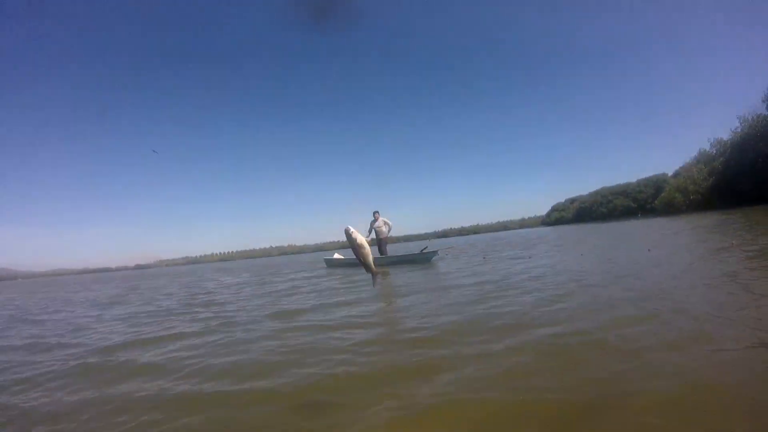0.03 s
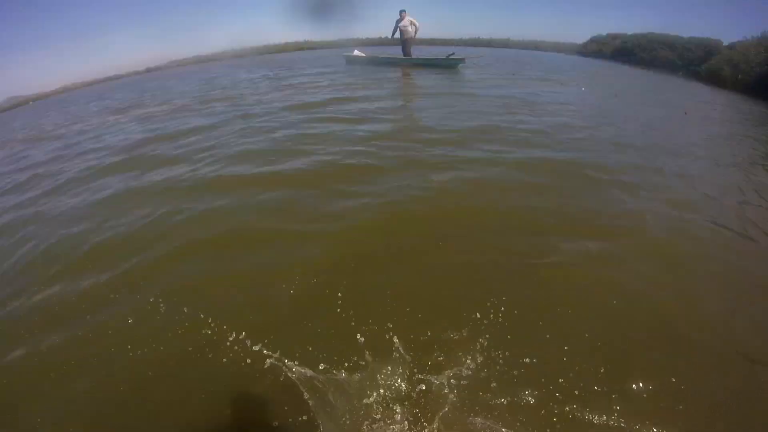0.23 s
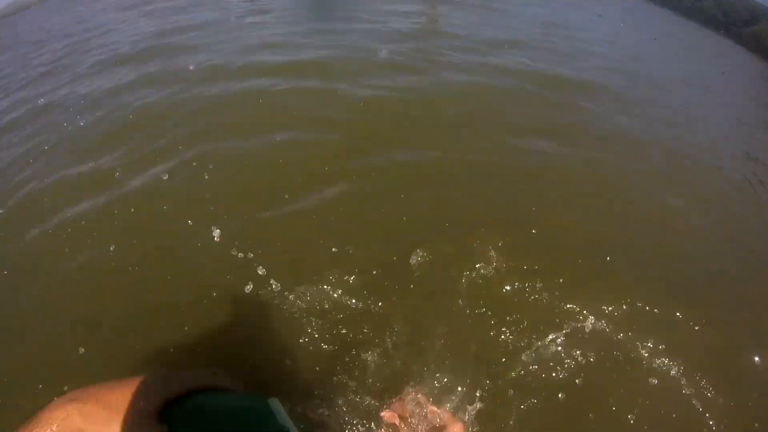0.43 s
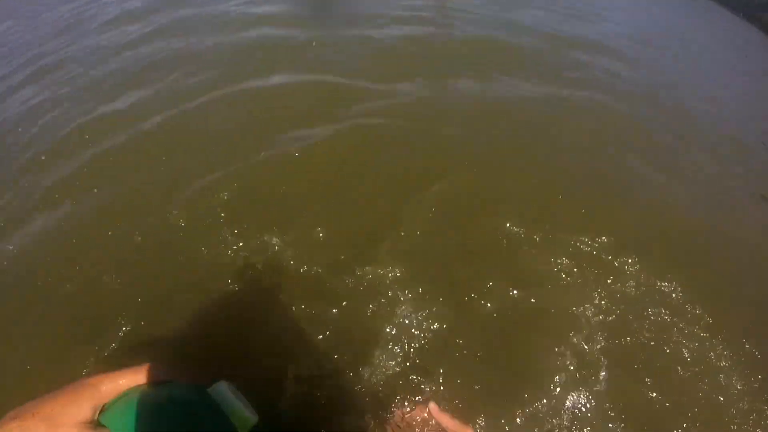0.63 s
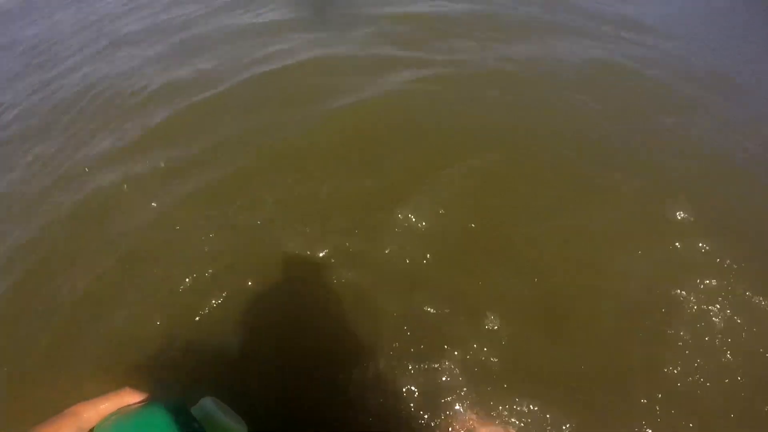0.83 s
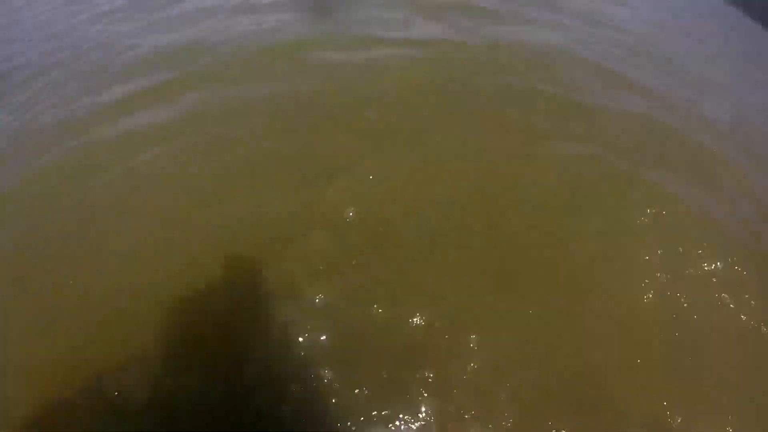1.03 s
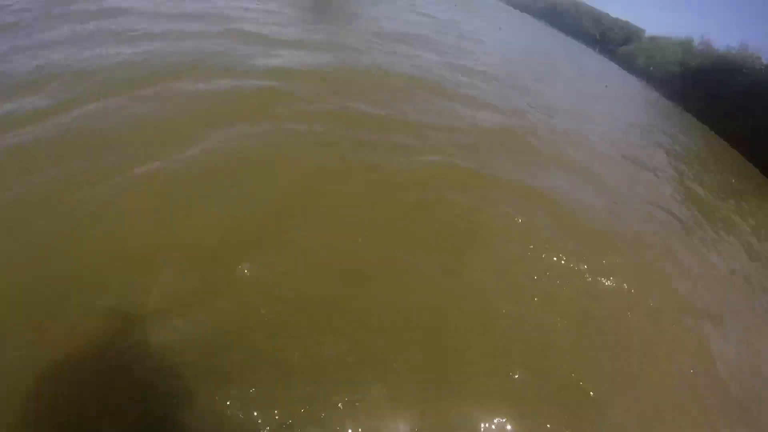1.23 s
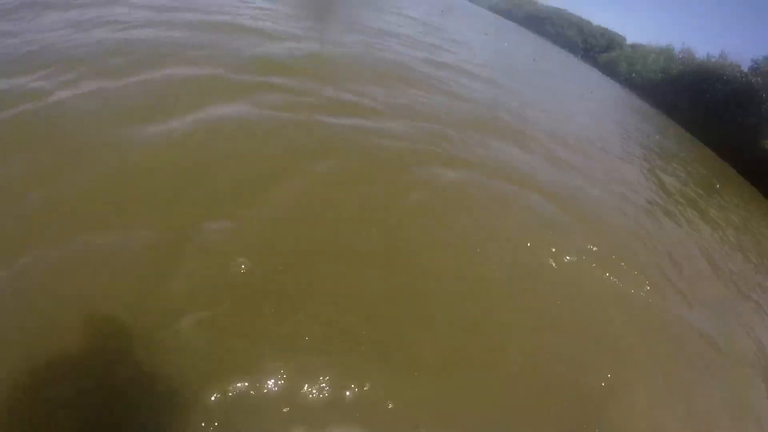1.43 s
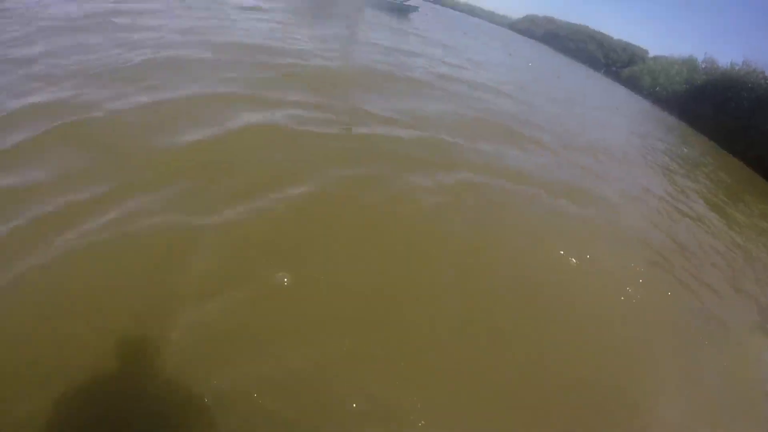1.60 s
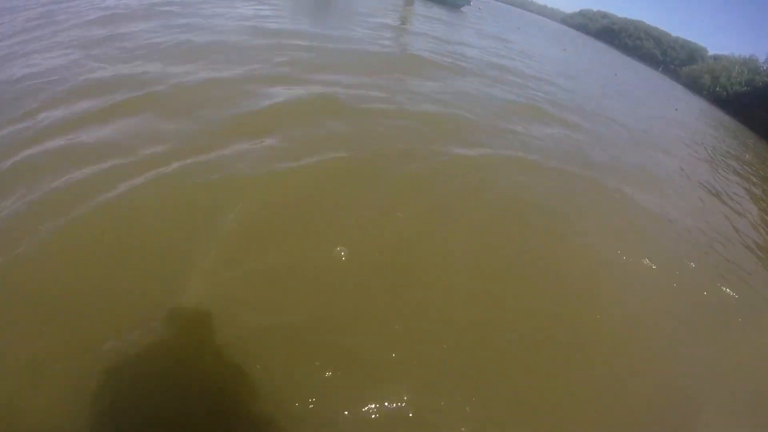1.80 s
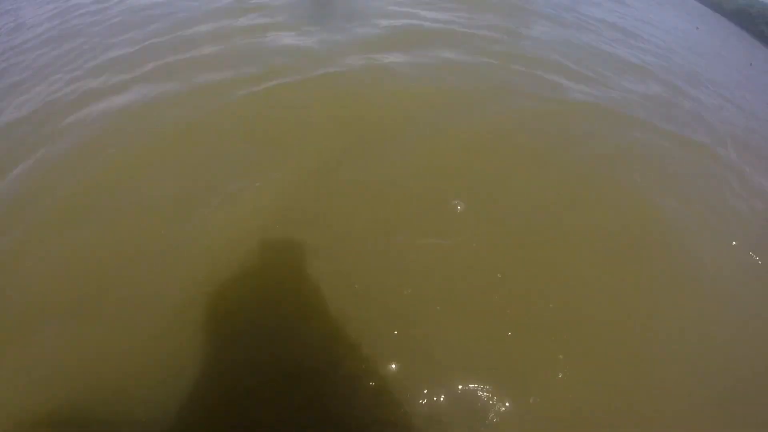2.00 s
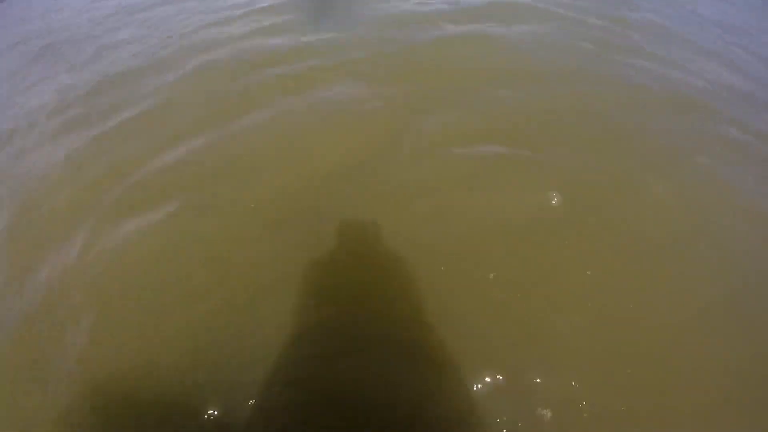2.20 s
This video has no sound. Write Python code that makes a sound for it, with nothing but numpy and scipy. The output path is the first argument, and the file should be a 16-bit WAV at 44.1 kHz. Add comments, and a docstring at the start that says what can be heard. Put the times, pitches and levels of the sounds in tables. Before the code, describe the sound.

A fish drops into open water beside a small boat with a sharp splash and low gulp. Spray and a few drips follow over low wind and steady water hiss, heard close through a closed waterproof camera case.

```python
"""A fish drops into the water beside a small boat, heard through a closed waterproof camera case.
A sharp slap is followed by a low surge, the gulp of the closing hole, falling spray and a few drips.
The splash and spray are crowds of tiny clicks that make the case ring; drips are short, rising tones.
A few drops tap the case, and low wind buffets it over a steady wash of open water."""
import sys
import numpy as np
from scipy import signal
from scipy.fft import rfft, irfft
from scipy.io import wavfile
from scipy.ndimage import uniform_filter1d

SR = 44100
rng = np.random.default_rng(int(sys.argv[2]) if len(sys.argv) > 2 else 0)


def int16_out(signal):
    """Quantize to a 16-bit WAV file."""
    q = np.round(np.clip(np.atleast_2d(signal).T, -1, 1) * 32767)
    wavfile.write(sys.argv[1], SR, q.astype(np.int16))


N = 103635


def amp(db):
    """Turns decibels into a number to multiply a sound by."""
    return 10 ** (np.asarray(db) / 20)


def unit(x):
    """Scales a sound so that its average (rms) level is 1."""
    return x / np.sqrt(np.mean(x ** 2) + 1e-20)


def level_at(points, hz):
    """Joins (frequency [Hz], level [dB]) points with straight lines on an octave scale."""
    point_hz, db = np.transpose(points)
    return np.interp(np.log(hz + 1), np.log(point_hz + 1), db)


def add(mix, start, sound):
    """Mixes a sound in at a start time in seconds."""
    part = mix[max(round(start * SR), 0):][:len(sound)]
    part += sound[:len(part)]


def ring(db):
    """The short ring, with energy 1, that one click leaves in a filter with this spectrum."""
    log_gain = np.log(amp(np.r_[db, db[-2:0:-1]]))
    spectrum = np.exp(np.conj(signal.hilbert(log_gain)))  # no ringing before the click
    response = irfft(spectrum[:len(db)])
    return response / np.linalg.norm(response)


def case_boost(hz):
    """The closed case rings at some frequencies and swallows one band; gives the boost in dB."""
    # peaks and one dip of the case (frequency [Hz], width [Hz], boost [dB])
    resonances = [(1480, 200, 3.5), (2120, 220, 6), (2485, 130, 13), (3216, 280, 8), (4025, 280, 8),
                  (5070, 590, -13), (6060, 1500, 7.5), (7140, 200, 3), (8400, 270, 8.5), (9700, 510, 10)]
    return sum(db / (1 + (2 * (hz - centre) / width) ** 2) for centre, width, db in resonances)


def wash(level_db=-51, patch_db=0.72, low_cut_hz=80, size=512):
    """Distant ripples and breeze blend into an even hiss with faint drifting patches."""
    # tone of open water (frequency [Hz], relative level [dB])
    colour = [(53, -14.5), (90, 2), (124, -3.5), (236, -3), (318, -5.5), (354, -8.5), (429, -8.5),
              (531, -8.5), (566, -10.5), (926, -12.5), (1120, -14), (1550, -15.5), (4050, -23), (6480, -28),
              (14900, -41.5)]
    hz, hop = np.fft.rfftfreq(size, 1 / SR), size // 4
    real, imaginary, patches = rng.standard_normal((3, N // hop + 5, len(hz)))
    patches = uniform_filter1d(patches, size=16, axis=0)  # smooth over time
    patches = unit(uniform_filter1d(patches, size=7, axis=1))  # and over frequency
    spectra = (real + 1j * imaginary) * amp(level_at(colour, hz) + patch_db * patches)
    hiss = signal.istft(spectra.T, nperseg=size, noverlap=size - hop)[1][:N]
    low_cut = signal.butter(2, low_cut_hz, "high", fs=SR, output="sos")
    return amp(level_db) * unit(signal.sosfilt(low_cut, hiss))


def wind():
    """Wind presses on the case and makes a lumpy rumble."""
    # tone of the rumble (frequency [Hz], relative level [dB])
    colour = [(4, -54), (12, 5.5), (20, 4.5), (30, -13.5), (42, -11.5), (60, -16), (90, -23.5),
              (150, -32.5), (400, -76)]
    # strength of the rumble (time [s], level [dB])
    levels = [(0, -38), (.1, -44), (.17, -27.5), (.3, -33.5), (.45, -31.5), (.62, -38), (.71, -42.5),
              (.78, -39), (1.02, -38.5), (1.3, -40.5), (1.44, -39), (1.65, -42), (1.87, -38), (2.0, -44.5),
              (2.35, -42)]
    t, hz = np.arange(N) / SR, np.fft.rfftfreq(N, 1 / SR)
    spectrum = rfft(rng.standard_normal(N)) * amp(level_at(colour, hz))
    return unit(irfft(spectrum, N)) * amp(np.interp(t, *np.transpose(levels)))


def thumps():
    """Slow, low thumps on the case: the surge of the splash, then a few later buffets."""
    # low thumps (time [s], width [s], peak level [dB])
    pulses = [(0.14, 0.0079, -27.5), (0.28, 0.014, -15), (0.373, 0.017, -22.5), (1.531, 0.01, -31),
              (1.738, 0.0084, -31.5), (1.857, 0.017, -25.5), (1.939, 0.013, -29), (2.05, 0.0065, -33.5),
              (2.18, 0.0061, -40), (2.295, 0.012, -32.5)]
    t, out = np.arange(N) / SR, np.zeros(N)
    for centre, width, db in pulses:
        offset = (t - centre) / width
        out += amp(db) * (1 - offset ** 2) * np.exp(-offset ** 2 / 2)
    return out


def taps():
    """Drops strike the plastic case, which rings very briefly."""
    # drops hitting the case (time [s], peak level [dB])
    hits = [(1.6892, -36.5), (1.6913, -38), (2.18, -40)]
    # tones of the struck plastic (pitch [Hz], relative level [dB], time to fade by 60 dB [s])
    tones = [(840, -12, 0.0056), (1390, -2, .007), (2020, 1, .009), (2800, 0, .006), (3970, -7, 0.011)]
    t, out = np.arange(SR // 20) / SR, np.zeros(N)
    tap = sum(amp(db - 60 * t / fade) * np.sin(2 * np.pi * hz * t) for hz, db, fade in tones)
    for start, db in hits:
        add(out, start, amp(db) * tap / abs(tap).max())
    return out


def drips(rise_s=0.00044, glide=0.0019):
    """Small bubbles ring for a few milliseconds, rising slightly in pitch."""
    # single drips and bubbles (time [s], pitch [Hz], level [dB], fade time [s])
    bubbles = [(0.176, 6600, -31.5, 0.0012), (.1782, 4300, -41, .0024), (.187, 2300, -44, 0.0035),
               (.248, 1590, -44, .007), (.261, 1550, -43, 0.0024), (.264, 2360, -44, 0.0047),
               (.281, 2170, -50, 0.0047), (0.301, 209, -40.5, 0.012), (.303, 920, -47, 0.0062),
               (.302, 4070, -43, 0.0017), (.3205, 2430, -38.5, 0.0028), (.323, 1110, -44, 0.0029),
               (0.326, 1480, -36.5, 0.0028), (.332, 2510, -46, 0.0024), (0.333, 1670, -41, .003),
               (0.335, 3180, -42, 0.0021), (.3468, 11600, -46, 0.00075), (0.3528, 4000, -47, 0.0018),
               (.3645, 1510, -47, 0.007), (.366, 6700, -51, .0015), (.4365, 1463, -44.5, 0.0063),
               (.444, 2070, -44, 0.005), (.5015, 2130, -46.5, .004), (.567, 6800, -49, .0022),
               (.571, 4350, -51, .004), (.6312, 2580, -45, .0045), (1.3187, 6280, -36, 0.0008),
               (1.3203, 2860, -45, .0025), (1.3222, 4100, -42.5, .0017)]
    t, out = np.arange(SR // 16) / SR, np.zeros(N)
    for start, hz, db, fade in bubbles:
        pitch = hz * (1 + glide * t / fade)
        cycles = np.cumsum(pitch) / SR
        swell = (1 - np.exp(-t / rise_s)) * np.exp(-t / fade)
        add(out, start, amp(db) * swell * np.sin(2 * np.pi * cycles))
    return out


def spray(drops_per_s=500, spread_db=3):
    """Thrown droplets patter back onto the water, one by one."""
    # strength of the falling spray (time [s], level [dB])
    levels = [(.24, -76), (.42, -73.5), (.52, -70.5), (.57, -66.5), (.66, -78), (.9, -88)]
    # tone of a droplet (frequency [Hz], relative level [dB])
    colour = [(500, -22), (2500, -18), (5000, -13.5), (7000, 1), (10000, -13), (15000, -25)]
    hz, t = np.linspace(0, SR / 2, 2049), np.arange(N) / SR
    sizes = amp(spread_db * np.minimum(rng.exponential(1, N), 3))  # many small, few big
    lands = rng.random(N) < drops_per_s / SR
    patter = unit(sizes * lands) * amp(np.interp(t, *np.transpose(levels)))
    return signal.fftconvolve(patter, ring(level_at(colour, hz) + case_boost(hz)))[:N]


def splash(drops_per_s=1800, spread_db=2.8, mist_gain=0.5):
    """The fish throws up bursts of drops and fine mist that swell, fade and make the case ring."""
    # bursts of water (time [s], rise time [s], fade time [s], level [dB], brightness [dB per octave])
    bursts = [(.1755, .001, 0.0038, -45, 1), (0.1835, 0.0038, 0.0056, -39, 3.5),
              (.135, 0.1, 0.039, -47.5, -2.5), (.231, 0.0033, .009, -45.5, 1.5),
              (0.242, .002, 0.0059, -48, -2), (.25, 0.031, 0.11, -51, -2), (.297, .006, 0.013, -41.5, -8.5),
              (.320, 0.0013, 0.0022, -43, -6), (.328, 0.0029, 0.0026, -42.5, -7),
              (.345, 0.0072, 0.035, -54, -3), (.3466, .0005, .0012, -51, 16), (.383, .004, .0035, -53, 4),
              (.434, .0047, 0.049, -51.5, -3.5), (.499, 0.0021, .02, -54.5, -3),
              (.507, .002, .003, -60, 11), (.545, .005, 0.0087, -60, 0), (0.565, 0.0052, .005, -55, 2),
              (.628, .004, .006, -60, 2), (0.961, 0.017, 0.017, -59, -2), (1.3185, .001, .0045, -52.5, 3),
              (1.6882, 0.001, 0.0018, -48.5, -4)]
    # tone of splashing water (frequency [Hz], relative level [dB])
    colour = [(80, -9), (200, 7), (500, -4.5), (1000, -1.5), (2000, -1.5), (3500, -4.5), (5200, -9),
              (8000, -14), (11000, -22), (15000, -29)]
    hz, t, out = np.linspace(0, SR / 2, 2049), np.arange(SR // 2) / SR, np.zeros(N)
    colour_db = level_at(colour, hz) + case_boost(hz)
    octaves = np.log2(np.maximum(hz, 700) / 2500)  # brightness tilts the tone above 700 Hz
    for start, rise, fade, db, brightness in bursts:
        sizes = amp(spread_db * np.minimum(rng.exponential(1, len(t)), 3))
        signs = rng.choice([-1, 1], len(t))
        lands = rng.random(len(t)) < drops_per_s / SR
        mist = mist_gain * rng.standard_normal(len(t))
        crowd = unit(unit(sizes * signs * lands) + mist)
        swell = np.minimum(t / rise, 1) * np.exp(-np.maximum(t - rise, 0) / fade)
        burst = signal.fftconvolve(crowd * swell, ring(colour_db + brightness * octaves))
        add(out, start, amp(db) * burst)
    return out


def scene():
    """All the sounds, added up in one channel."""
    return (splash() + drips() + taps() + wash() + wind() + thumps() + spray())[None]


def record(dry, cutoff_hz=15120):
    """Cuts away the very highest treble."""
    low_pass = signal.firwin(511, cutoff_hz, window=("kaiser", 9), fs=SR)
    return signal.oaconvolve(dry, low_pass[None], "same")


dry = scene()
out = record(dry)
int16_out(out)
```